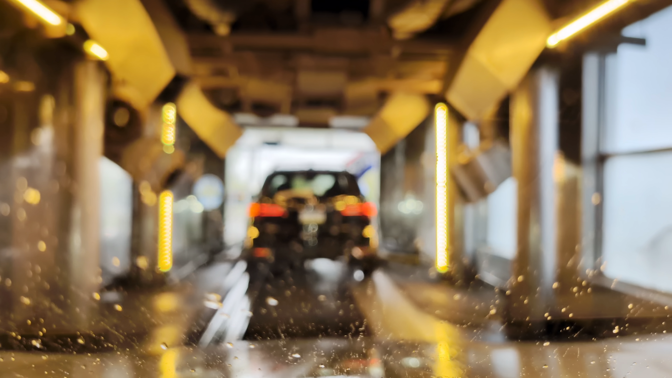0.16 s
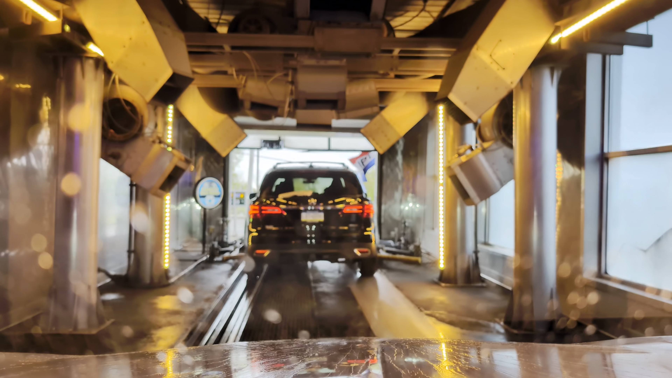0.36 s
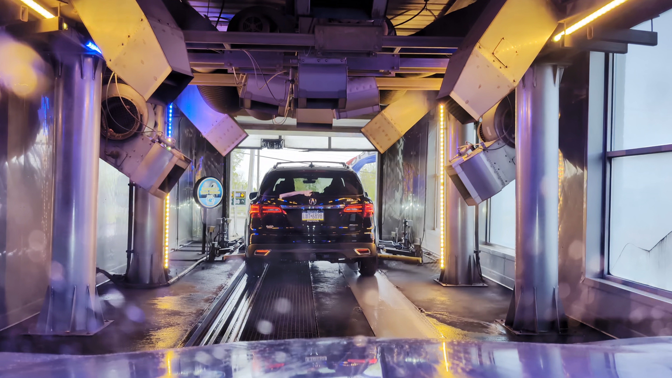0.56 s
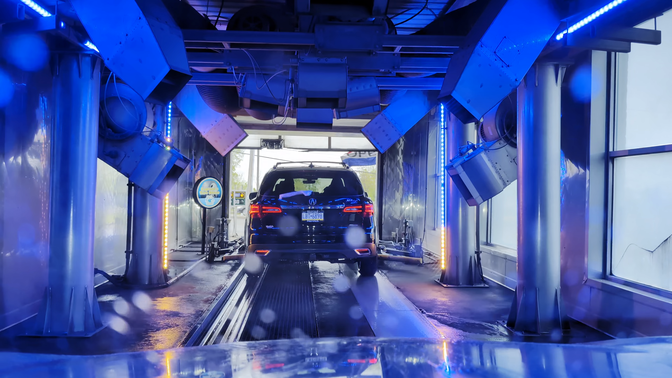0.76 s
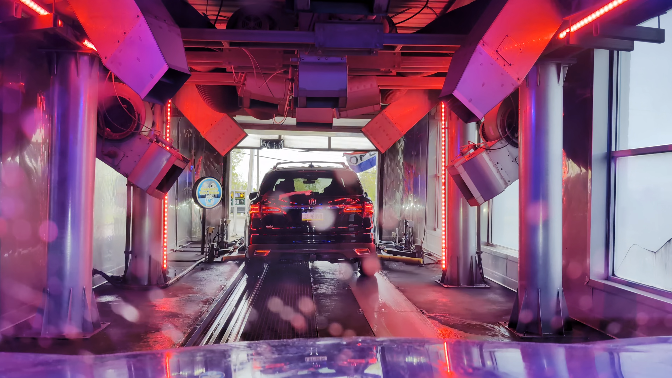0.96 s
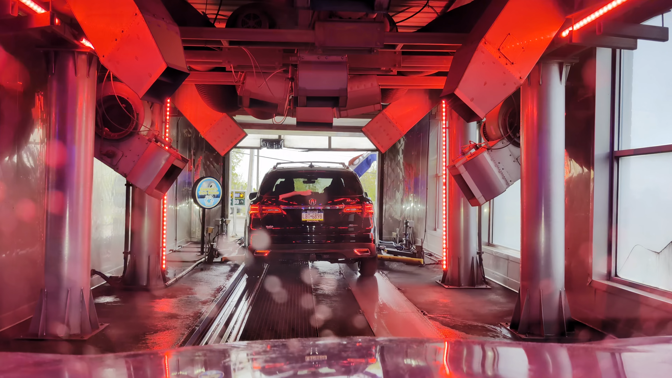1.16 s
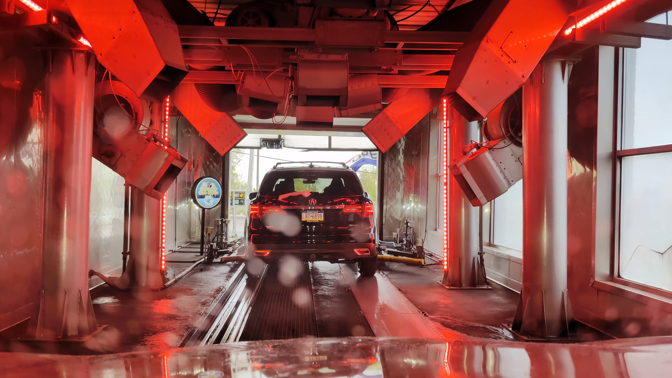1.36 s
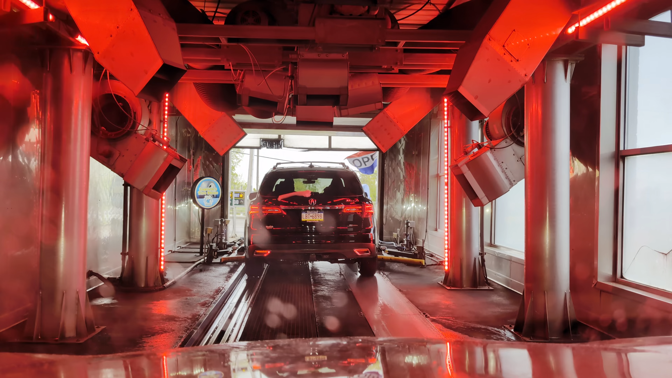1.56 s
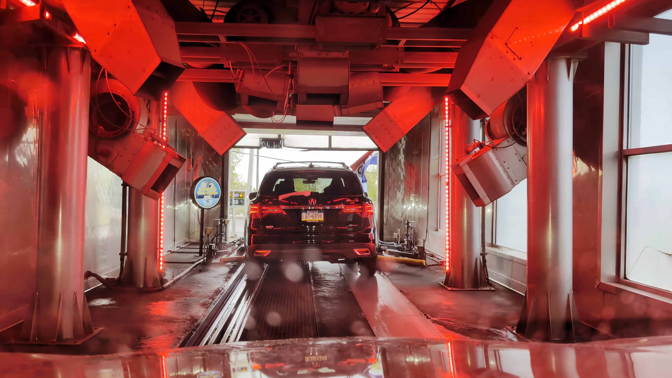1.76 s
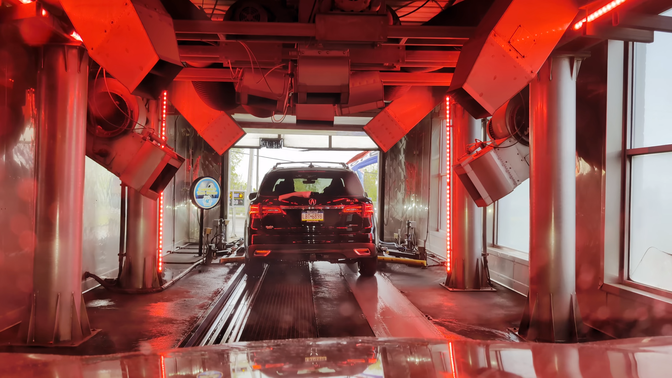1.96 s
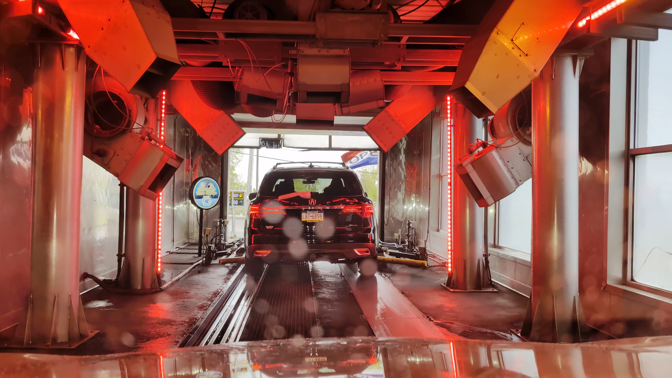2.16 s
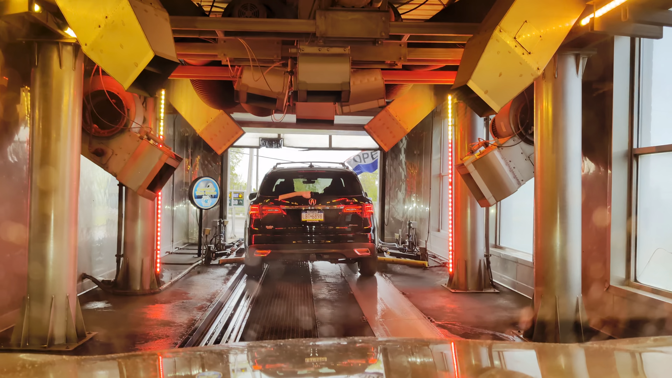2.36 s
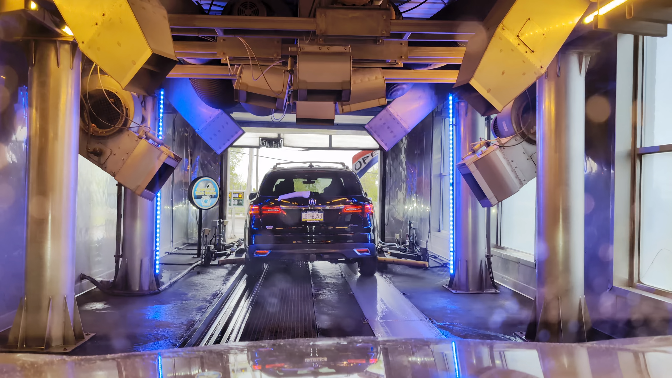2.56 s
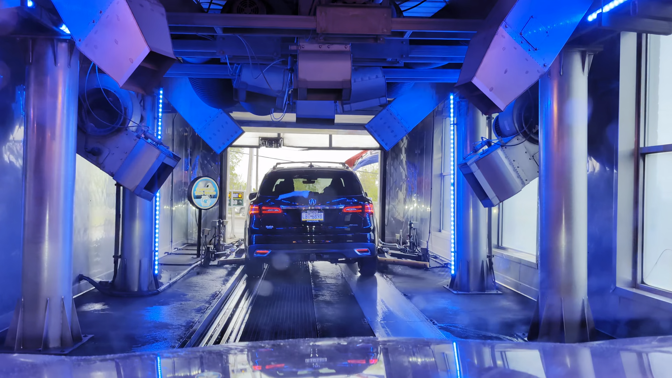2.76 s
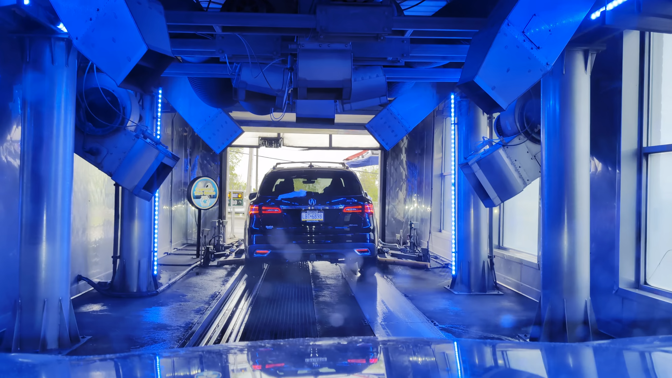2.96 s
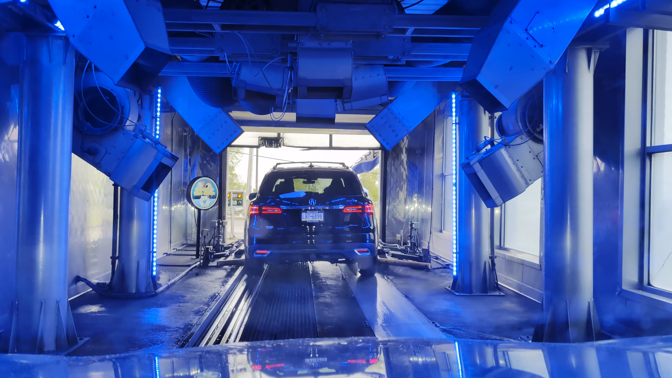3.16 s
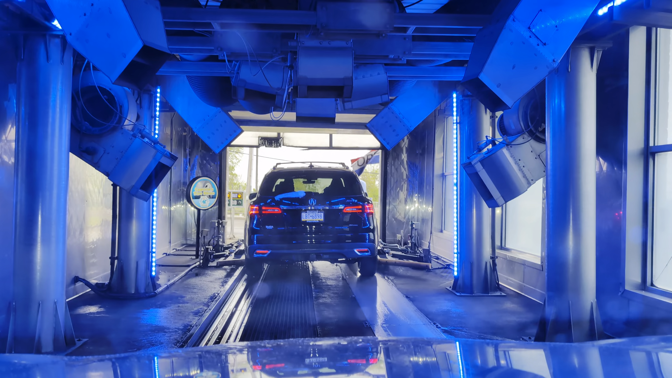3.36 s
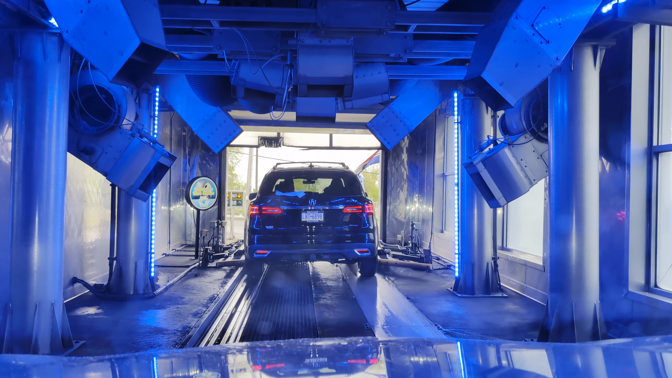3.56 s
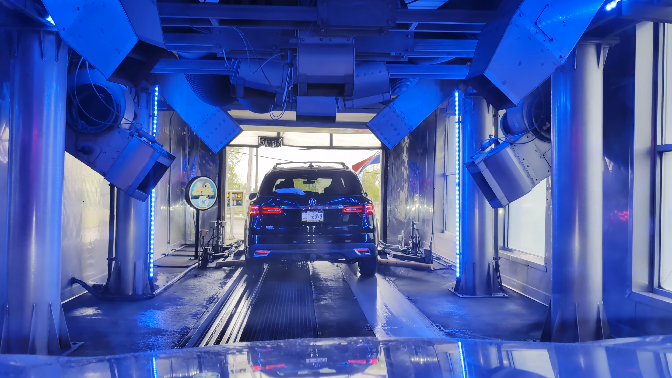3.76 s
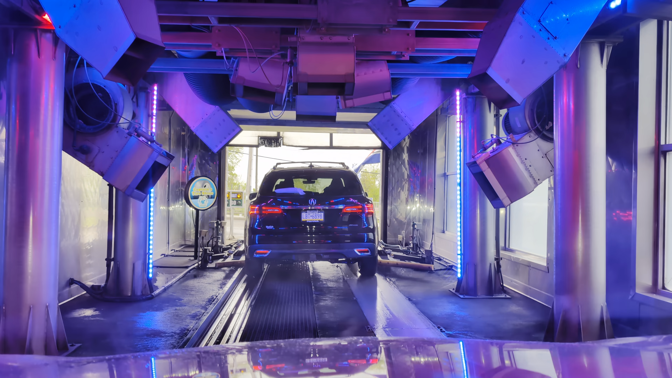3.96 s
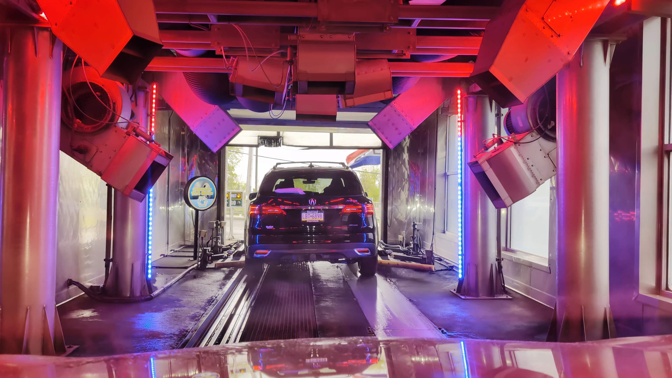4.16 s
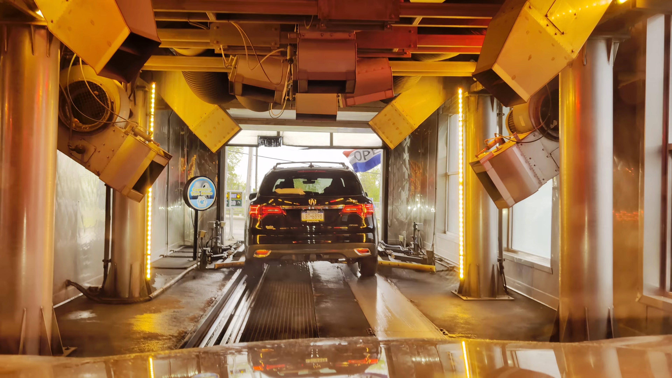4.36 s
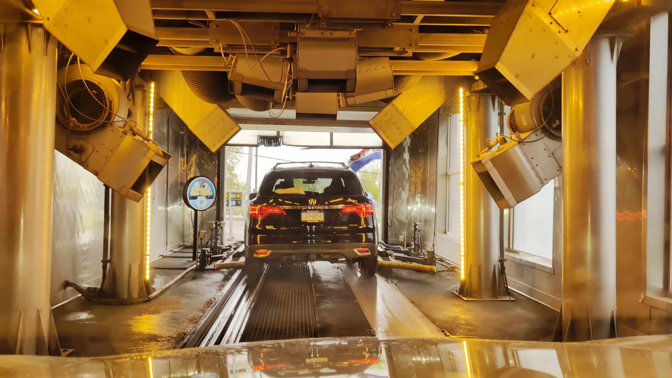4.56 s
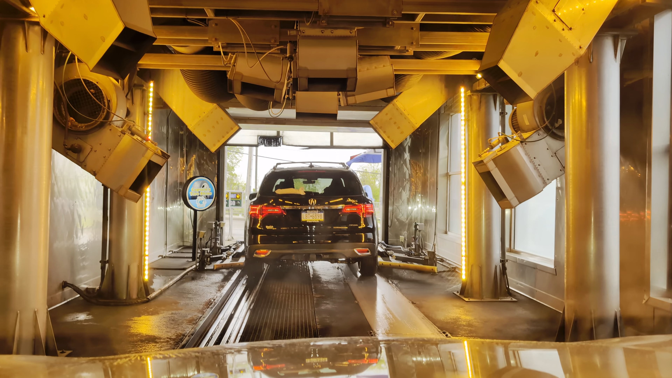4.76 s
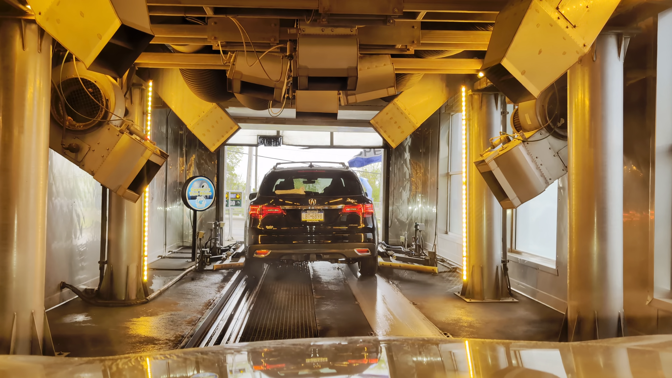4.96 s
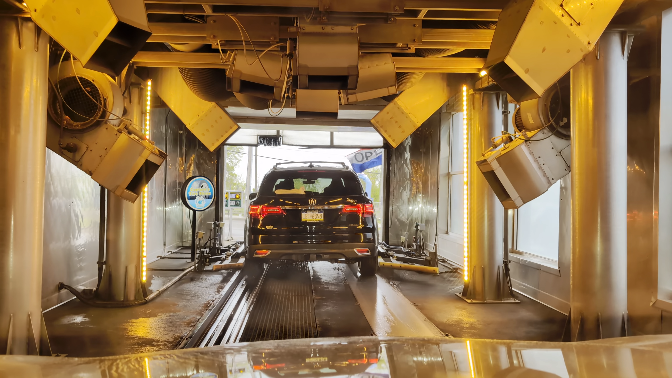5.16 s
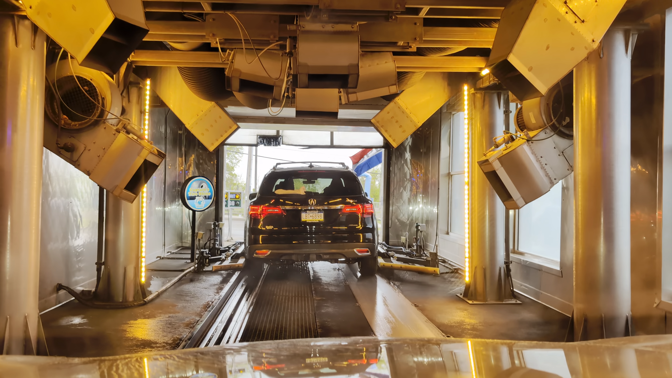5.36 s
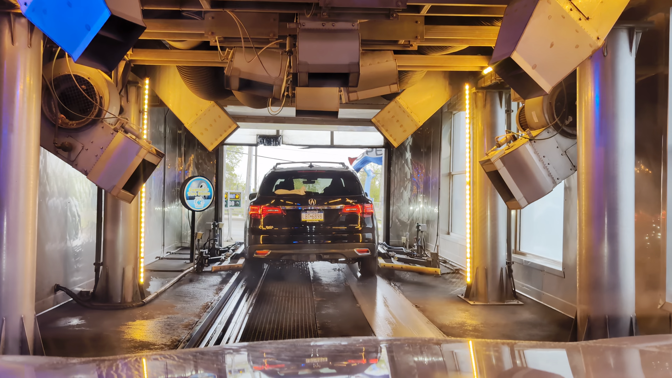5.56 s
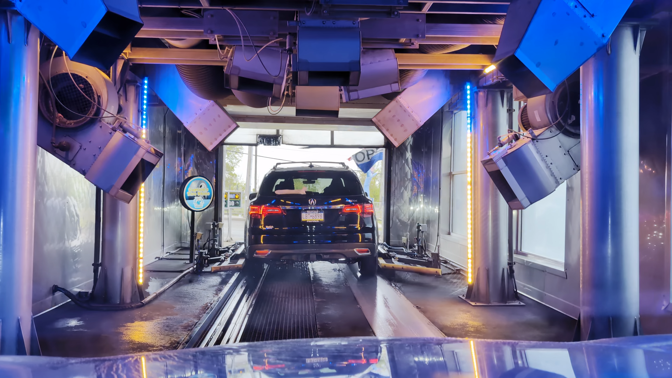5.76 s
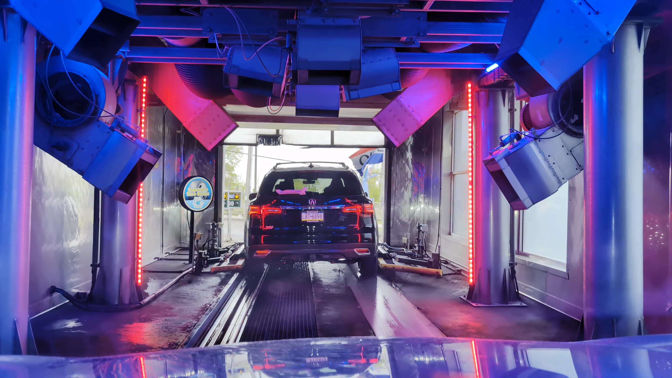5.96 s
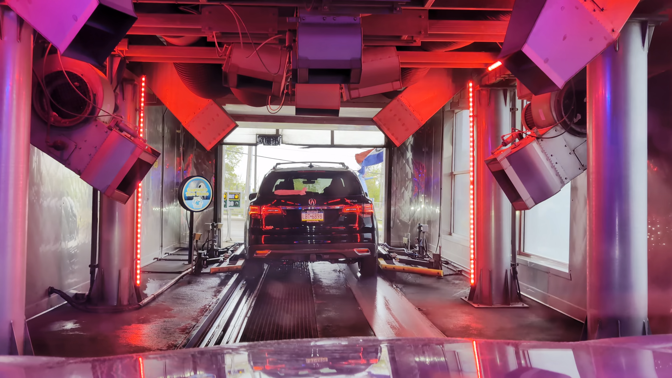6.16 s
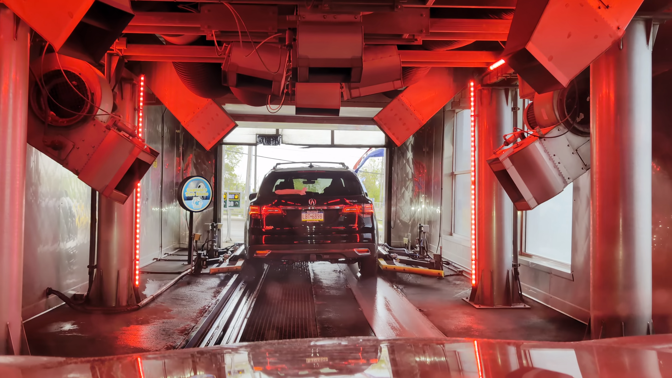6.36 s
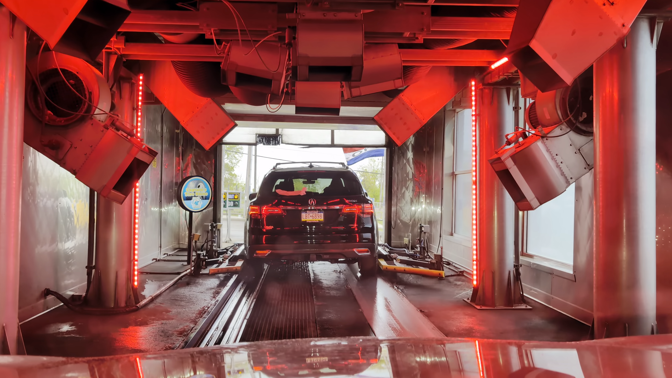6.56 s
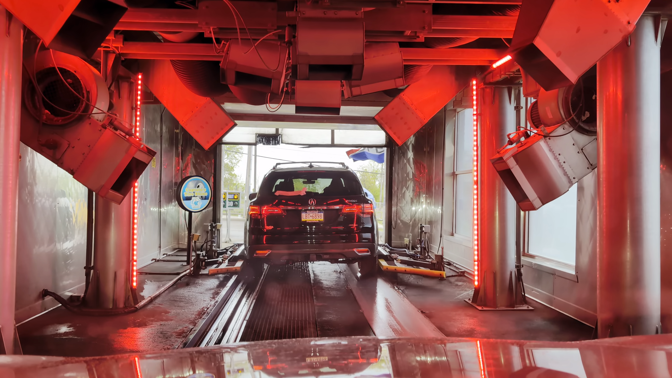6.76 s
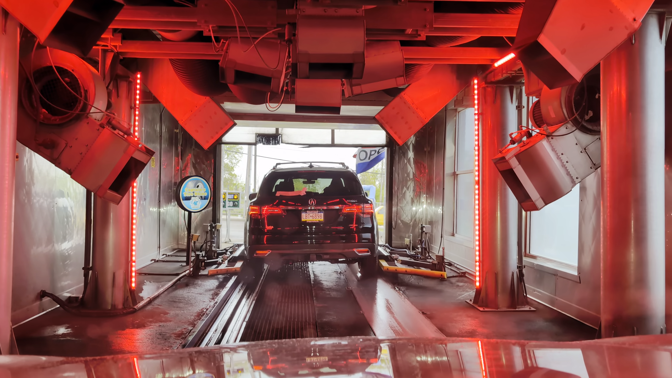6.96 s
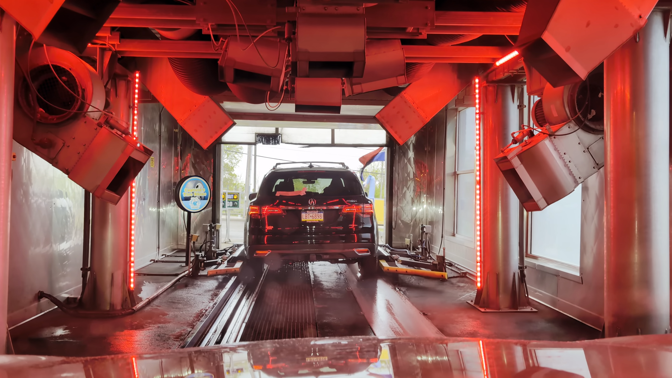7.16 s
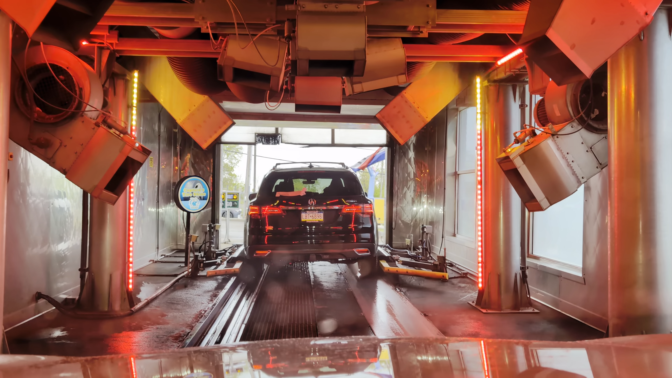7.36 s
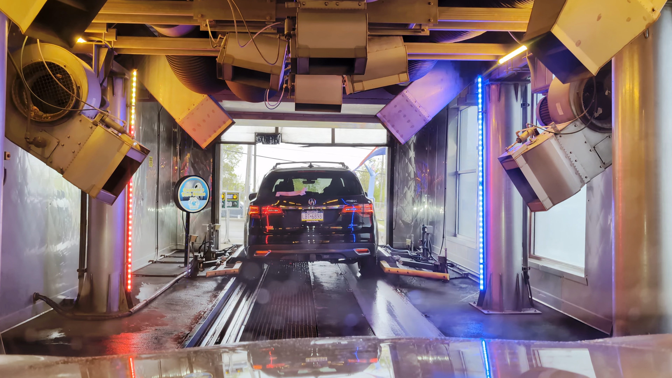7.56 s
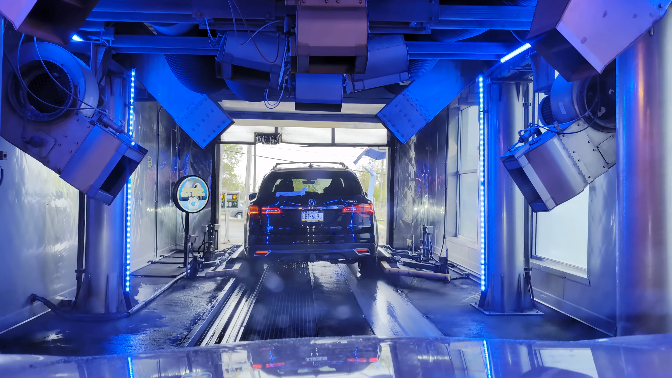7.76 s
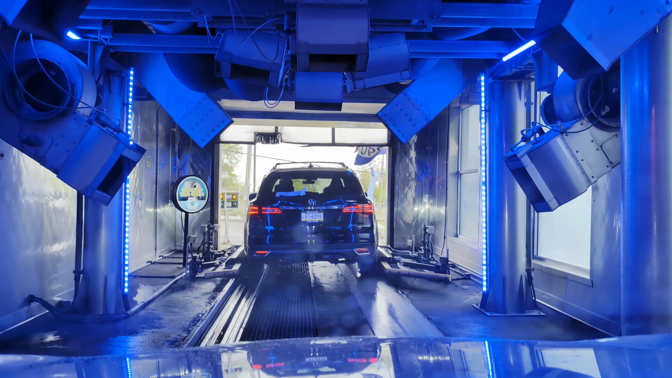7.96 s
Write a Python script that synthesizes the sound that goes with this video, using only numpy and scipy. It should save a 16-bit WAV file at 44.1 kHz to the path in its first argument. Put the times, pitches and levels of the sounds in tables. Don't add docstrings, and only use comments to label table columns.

```python
import sys
import numpy as np
from scipy import signal
from scipy.fft import rfft, irfft
from scipy.io import wavfile
from scipy.ndimage import uniform_filter1d, minimum_filter1d

SR = 44100
rng = np.random.default_rng(int(sys.argv[2]) if len(sys.argv) > 2 else 0)


def undo_db(level):
    steps = np.asarray(level, float) / 20
    return 10 ** steps


def dump_mix(stems):
    frames = np.atleast_2d(stems).T
    limited = np.clip(frames, -1, 1)
    pcm = np.round(limited * 32767).astype(np.int16)
    wavfile.write(sys.argv[1], SR, pcm)


N = 352800
TIME_S = np.arange(N) / SR
FREQ_HZ = np.maximum(np.fft.rfftfreq(N, 1 / SR), 1)
LEFT_RIGHT = np.array([[1], [-1]])
CONTROL_STEP = 40

# (frequency [Hz], level [dB per Hz])
ROAR_SPECTRUM = [(18, -41), (30, -7), (54, -1), (91, -8), (182, -9), (263, -12), (365, -15), (506, -19),
                 (702, -18), (778, -24), (974, -25), (1250, -23), (1380, -25), (3070, -38), (4000, -41.5),
                 (5200, -69), (8800, -120)]
# (frequency [Hz], level [dB per Hz])
HISS_SPECTRUM = [(1800, 0), (3000, -3), (4200, -0.5), (5500, -5), (7900, -16), (9300, -24), (11400, -24),
                 (12300, -28.5), (13500, -30), (15000, -33), (15700, -36)]
# (frequency [Hz], width [Hz], lift [dB], pull on likeness [1])
CROSS_MODES = [(92, 36, -0.5, 0.31), (443, 99, 1, 0.36), (518, 38, -0.5, 0.14), (702, 65, 2.5, 0.14),
               (724, 46, 5.5, 0.41), (814, 44, 4.5, .01), (953, 100, 2, 0.58), (1026, 73, 1.5, 0.47),
               (1209, 59, -2, 0.64), (1282, 79, -2, 0.42), (1416, 57, 1, .01), (1502, 50, -2, .15),
               (1596, 45, 0.5, .01), (2850, 190, 3.5, 0.3)]
# (frequency [Hz], left-right correlation [1])
PORT_LIKENESS = [(40, 0.91), (210, 0.99), (300, 0.81), (390, 0.79), (650, 0.25), (830, 0.033), (1400, .05),
                 (1600, 0.16), (2300, 0.26), (2700, .03), (4000, .01)]
# (frequency [Hz], left minus right [dB])
PORT_TILT = [(60, -1), (300, -0.1), (760, 0.2), (1300, 0.5), (2100, .01), (3400, -2.5), (4500, -7),
             (7000, -6.5), (8100, -7), (9300, -15.5), (11300, -16), (13000, -4), (14500, 6), (15500, 6)]

BLADE_RATES_HZ = (701, 704, 707, 709.7, 713)
# (level [dB rms], pitch wander [Hz], left minus right phase [rad])
IMPELLERS = [(-45, 1.0, 2.5), (-42, 1.0, -2.2), (-38, .8, 2.0), (-35, .6, 2.6), (-45, 1.0, -1.5)]
# (multiple of turn rate [1], level [dB rms])
SHAFT_ORDERS = [(2, -35), (3, -38), (4, -41), (6.07, -35.5)]
# (time [s], peak level [dB], length [s])
TONE_SWELLS = [(0.04, -27, 0.064), (0.15, -29.5, 0.08), (0.81, -41, 0.053), (1.05, -30, 0.11),
               (1.23, -33, 0.07), (1.47, -29, 0.11), (1.88, -34, 0.11), (2.04, -29, 0.11),
               (2.24, -33, 0.096), (2.56, -23, 0.07), (2.91, -24.5, 0.15), (3.23, -28.5, 0.1),
               (3.51, -26.5, 0.05), (3.69, -24, 0.053), (3.83, -26, 0.07), (4.31, -27.5, 0.062),
               (4.68, -26.5, 0.098), (4.93, -25.5, 0.056), (5.07, -26, 0.055), (5.5, -28, 0.13),
               (5.87, -24, 0.07), (5.99, -26, 0.05), (6.13, -23.5, 0.07), (6.39, -24.5, 0.06),
               (6.55, -27, 0.057), (6.91, -26, 0.074), (7.57, -25, 0.081), (7.96, -24, 0.056)]
# (time [s], peak level [dB], length [s])
OVERTONE_SWELLS = [(0.24, -39, 0.11), (1.02, -40, 0.06), (1.23, -37, 0.12), (2.18, -41, 0.19),
                   (2.52, -38, 0.11), (2.67, -41.5, 0.06), (4.31, -36, 0.18), (4.56, -39, 0.081),
                   (4.96, -42, 0.08), (5.15, -40.3, 0.09), (6.0, -38.5, 0.15), (6.73, -38, 0.08),
                   (7.37, -41, 0.08), (7.77, -37.5, 0.09)]

# (time [s], load [dB])
ROOF_LOAD = [
    (0, 1.5),
    (1, -1),
    (3, -3),
    (4.5, -1.5),
    (5.8, 7.5),
    (6.6, 7.5),
    (7.3, 12),
    (8, 12.5),
]
# (time [s], peak level [dB], length [s], pitch [Hz])
CABIN_GUSTS = [(0.17, -14, 0.07, 57.6), (0.4, -16, 0.06, 55.7), (0.61, -12.5, 0.071, 53.2),
               (0.82, -17.5, 0.05, 55.7), (0.97, -25, 0.06, 54.6), (1.29, -22, 0.055, 56),
               (1.63, -17.7, 0.05, 56.9), (1.97, -12.5, 0.07, 54.4), (2.11, -12.5, 0.065, 53.1),
               (2.5, -16, 0.08, 52.6), (2.61, -26, 0.076, 56.6), (2.87, -26, 0.097, 59.4),
               (3.11, -19, 0.048, 55.2), (3.5, -16, 0.052, 54.8), (3.62, -16.6, 0.12, 54.5),
               (3.87, -18.6, 0.06, 53.2), (4.33, -19, 0.083, 57.6), (4.56, -12, 0.085, 55.3),
               (4.83, -15.5, 0.092, 53.7), (5.18, -15, 0.067, 54.5), (5.38, -17, 0.067, 54.7),
               (5.98, -11.5, 0.079, 54.9), (6.35, -15, 0.14, 55.4), (6.62, -12.5, 0.094, 58.8),
               (6.87, -11.5, 0.17, 54.4), (7.04, -13, 0.14, 58.4), (7.38, -10.5, 0.2, 57.86),
               (7.63, -9, 0.09, 56.87), (7.76, -12.5, 0.089, 53.9), (7.89, -14, 0.1, 54.6)]
# (time [s], peak level [dB], length [s])
ROOF_HITS = [(0.43, -19, 0.11), (0.58, -20.7, 0.07), (1.46, -18.1, 0.086), (1.88, -22, 0.15),
             (2.68, -19, 0.086), (2.94, -23, 0.09), (3.75, -18, 0.19), (4.08, -21, 0.069),
             (4.56, -15, 0.12), (4.93, -13, 0.12), (5.63, -16.5, 0.065), (6.82, -16.5, 0.11),
             (7.11, -16.0, 0.074), (7.26, -15.5, 0.12), (7.51, -16.7, 0.09), (7.87, -18, 0.077)]
# (time [s], peak level [dB], length [s])
DOOR_HITS = [(0.25, -14, 0.074), (0.57, -15, 0.072), (1.42, -9, 0.075), (1.67, -14, 0.087),
             (1.82, -12, 0.064), (2.01, -19, 0.055), (2.41, -17, 0.09), (2.76, -15, 0.11),
             (2.99, -14.5, 0.11), (3.44, -17.5, 0.38), (3.61, -13, 0.076), (4.48, -17, 0.19),
             (4.61, -22, 0.097), (5.52, -16, 0.28), (6.28, -17.5, 0.19), (6.68, -18, 0.09),
             (7.25, -26, 0.1), (7.94, -14.5, 0.11)]

# (low edge [Hz], high edge [Hz])
GATE_BANDS = [(8080, 9420), (9420, 11800), (11800, 16000)]
# (start [s], shut [s], starting gain [dB])
LOW_GATE_SPELLS = [
    (0, 3.63, -8.5),
    (5.5, 7.15, -6.5),
    (7.16, 8.2, -4),
]
# (time [s], before [dB], after [dB], sag [dB/s])
UPPER_GATE_STEPS = [
    (2.66, -5.4, -6.3, .01),
    (2.56, -3.5, -4.8, .5),
]
# (frequency [Hz], threshold re usual level [dB])
MUTE_THRESHOLD = [(3000, -12), (6000, -6.5), (8000, -2), (8300, 1), (9500, -5.5), (12000, -1), (15000, -2)]


def rms_one(x):
    return x / np.sqrt(np.mean(x ** 2) + 1e-20)


def in_time(rows):
    time_s, *columns = np.transpose(rows)
    return [np.interp(TIME_S, time_s, column) for column in columns]


def at_hz(points):
    hz, value = np.transpose(points)
    return np.interp(np.log(FREQ_HZ), np.log(hz), value)


def bell(hz, width_hz):
    return 1 / (1 + (2 * (FREQ_HZ - hz) / width_hz) ** 2)


def drift(rate_hz):
    pole = np.exp(-2 * CONTROL_STEP * np.pi * rate_hz / SR)
    noise = rng.standard_normal(N // CONTROL_STEP + 4002)
    slow = signal.lfilter([1], [1, -2 * pole, pole * pole], noise)[4000:]
    return np.interp(np.arange(N) / CONTROL_STEP, np.arange(len(slow)), rms_one(slow))


def swells(rows, rest_db, stretch):
    t = np.arange(0, N, CONTROL_STEP) / SR
    time_s, peak_db, length_s = np.transpose(rows)[:3, :, None]
    shape = np.exp(-4 * np.log(2) * ((t - time_s) / (stretch * length_s)) ** 2)
    power = (undo_db(2 * peak_db) * shape).sum(axis=0)
    return 10 * np.log10(undo_db(2 * rest_db) + np.interp(TIME_S, t, power))


def cabin_noise(colour):
    pull = sum(pull * bell(hz, width_hz) for hz, width_hz, _, pull in CROSS_MODES)
    alike = np.clip(at_hz(PORT_LIKENESS) - pull, -.98, .98)
    mid, side = rfft(rng.standard_normal((2, N)))
    spectra = np.sqrt(1 + alike) * mid + np.sqrt(1 - alike) * side * LEFT_RIGHT
    tilt = undo_db(at_hz(PORT_TILT) / 2 * LEFT_RIGHT)
    ports = irfft(spectra * colour * tilt, N)
    return ports / np.sqrt(np.mean(ports.mean(axis=0) ** 2))


def evened(x, share, span_s):
    power = uniform_filter1d(x.mean(axis=0) ** 2, int(span_s * SR))
    return x / np.sqrt(power + 0.017) ** share


def roar(gust):
    start_db, rise_db, rise_s = -22, 2.5, 1.9
    level_db = start_db + rise_db * (1 - np.exp(-TIME_S / rise_s)) + 5.5
    lift_db = sum(lift_db * bell(hz, width_hz) for hz, width_hz, lift_db, _ in CROSS_MODES)
    noise = cabin_noise(undo_db(at_hz(ROAR_SPECTRUM) + lift_db))
    return undo_db(level_db + 0.44 * gust) * noise


def hiss(gust):
    rest_db, spray_db, spray_from_s, spray_to_s, dry_s = -42.5, 2, 1.1, 2.4, 0.28
    spray = in_time([(spray_from_s, 0), (spray_to_s, spray_db), (spray_to_s + dry_s, 0)])[0]
    level_db = rest_db + spray + 4
    low_cut = FREQ_HZ ** 2 / (FREQ_HZ ** 2 + 1200 ** 2)
    noise = cabin_noise(undo_db(at_hz(HISS_SPECTRUM)) * low_cut)
    return undo_db(level_db + 0.12 * gust + 0.25 * drift(5.8)) * noise


def air_stream():
    gust = drift(2.1)
    return roar(gust) + hiss(gust)


def shaft_hum(blade_phase):
    blades = 12
    hum = np.zeros(N)
    for turns, level_db in SHAFT_ORDERS:
        hum += undo_db(level_db + 0.92 * drift(2.7)) * np.sin(turns / blades * blade_phase)
    return hum


def impellers():
    tones = np.zeros((2, 2, N))
    for blade_hz, (level_db, wander_hz, lead_rad) in zip(BLADE_RATES_HZ, IMPELLERS):
        pitch_hz = blade_hz + wander_hz * drift(1.4)
        phase = 2 * np.pi * (np.cumsum(pitch_hz) / SR + rng.random())
        ports = phase + lead_rad / 2 * LEFT_RIGHT
        tones += [undo_db(level_db) * np.sin(ports), undo_db(2 * level_db) * np.sin(2 * ports)]
    power = np.mean(tones ** 2, axis=1, keepdims=True)
    tone, overtone = tones / np.sqrt(uniform_filter1d(power, size=2000))
    tone_db = swells(TONE_SWELLS, -39, stretch=0.7) + 7.0
    overtone_db = swells(OVERTONE_SWELLS, -49, stretch=1.3) + 0.5
    return undo_db(tone_db) * tone + undo_db(overtone_db) * overtone + shaft_hum(phase)


def boom():
    boom_hz, width_hz, swing_rest_db, blur_rest_db, blur_db = 56, 24, -30, -31, -9
    load_db, = in_time(ROOF_LOAD)
    pitch_hz = in_time(CABIN_GUSTS)[2]
    swing = np.sqrt(2) * np.sin(2 * np.pi * np.cumsum(pitch_hz) / SR)
    blur = cabin_noise(bell(boom_hz, width_hz))
    swing_level_db = swells(CABIN_GUSTS, swing_rest_db + load_db, stretch=0.87) - 0.5
    blur_level_db = swells(CABIN_GUSTS, blur_rest_db - blur_db + load_db, stretch=1.2) + blur_db
    return undo_db(swing_level_db) * swing + undo_db(blur_level_db) * blur


def drumming():
    roof_hz, roof_width_hz, roof_rest_db, roof_db_per_load_db = 131.2, 62, -25.5, .4
    door_hz, door_width_hz, door_rest_db, door_db_per_load_db = 180.1, 47, -21, -.5
    drum_db = -3.5
    load_db, = in_time(ROOF_LOAD)
    roof_db = swells(ROOF_HITS, roof_rest_db + roof_db_per_load_db * load_db, stretch=0.71) + 3.0
    door_db = swells(DOOR_HITS, door_rest_db + door_db_per_load_db * load_db, stretch=0.49) + 2.5
    roof = evened(cabin_noise(bell(roof_hz, roof_width_hz)), share=0.14, span_s=0.18)
    doors = evened(cabin_noise(bell(door_hz, door_width_hz)), share=1.0, span_s=0.12)
    return undo_db(roof_db + drum_db) * roof + undo_db(door_db + drum_db) * doors


def scene():
    return air_stream() + impellers() + boom() + drumming()


def gate_levels_db(t):
    creep_db_per_s, open_db, shut_db = 4, -0.5, -6
    lowest = np.full(len(t), float(shut_db))
    for start_s, shut_s, from_db in LOW_GATE_SPELLS:
        creep_db = np.minimum(from_db + creep_db_per_s * (t - start_s), open_db)
        lowest = np.where((t >= start_s) & (t < shut_s), creep_db, lowest)
    levels = [lowest]
    for step_s, before_db, after_db, sag_db_per_s in UPPER_GATE_STEPS:
        levels.append(np.where(t < step_s, before_db, after_db - sag_db_per_s * (t - step_s)))
    return levels


def gate_and_mute(x):
    hz, t, cells = signal.stft(x, SR, nperseg=2048, boundary="even")
    for (low_hz, high_hz), gate_db in zip(GATE_BANDS, gate_levels_db(t)):
        cells[:, (hz > low_hz) & (hz <= high_hz)] *= undo_db(gate_db)
    level_db = 10 * np.log10(uniform_filter1d(np.abs(cells) ** 2, size=4, axis=1) + 1e-20)
    usual_db = uniform_filter1d(level_db, size=16, axis=2)
    threshold_db = np.interp(hz, *np.transpose(MUTE_THRESHOLD), left=-60)[:, None]
    kept = np.where(level_db > usual_db + threshold_db, 1, .05)
    return signal.istft(cells * kept, SR, nperseg=2048)[1][:, :N]


def limiter(x):
    ceiling = .94
    gain = np.minimum(1, ceiling / (np.abs(x).max(axis=0) + 1e-9))
    return x * uniform_filter1d(minimum_filter1d(gain, size=801), size=401)


def band_limit(x):
    return signal.sosfilt(signal.butter(12, 15740, fs=SR, output="sos"), x)


def record(dry):
    bass_cut = signal.butter(6, 44, "high", fs=SR, output="sos")
    mix = limiter(gate_and_mute(signal.sosfilt(bass_cut, dry)))
    return band_limit(mix)


dry = scene()
out = record(dry)
dump_mix(out)
```